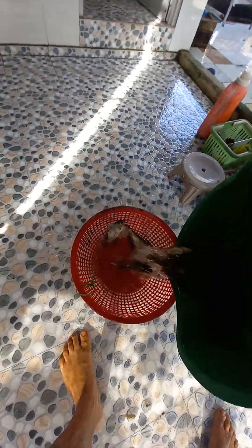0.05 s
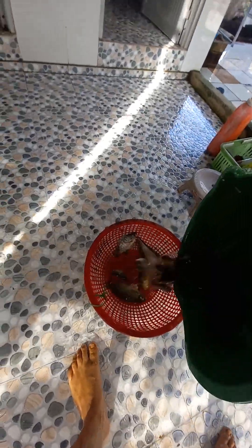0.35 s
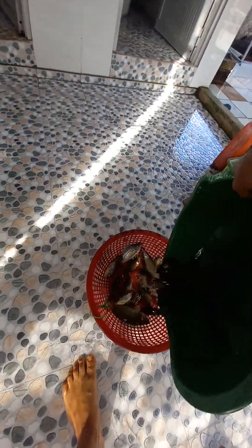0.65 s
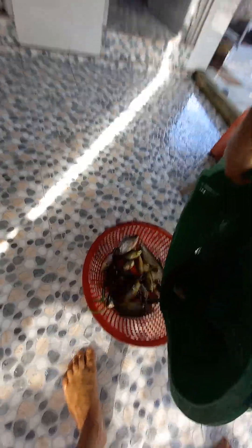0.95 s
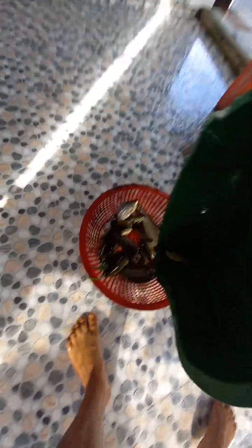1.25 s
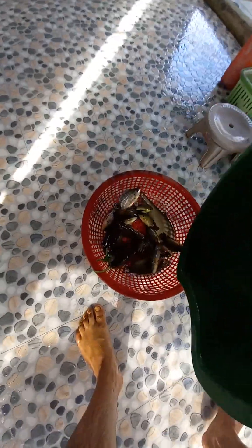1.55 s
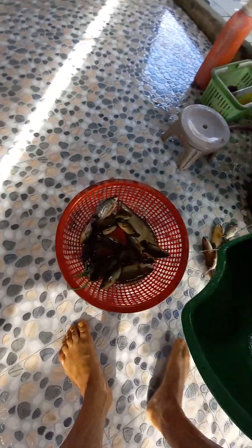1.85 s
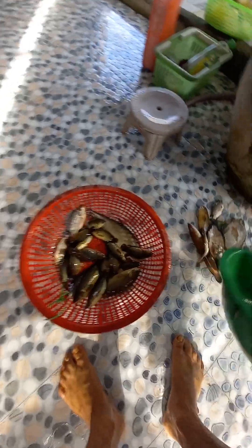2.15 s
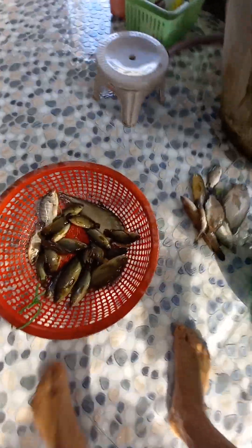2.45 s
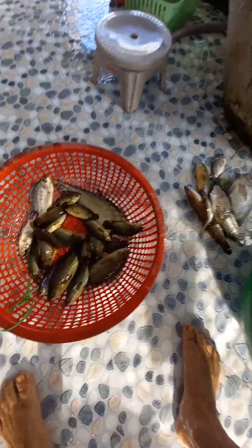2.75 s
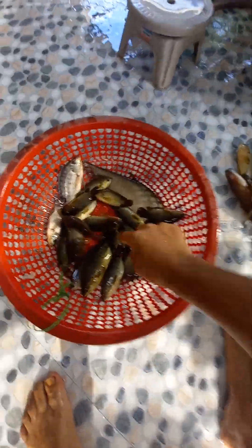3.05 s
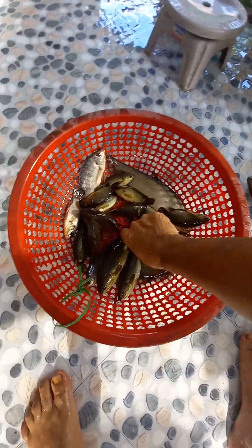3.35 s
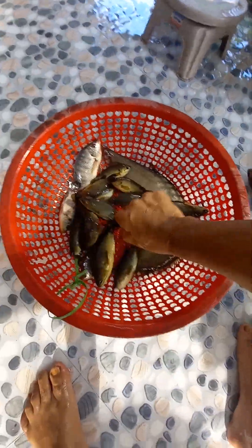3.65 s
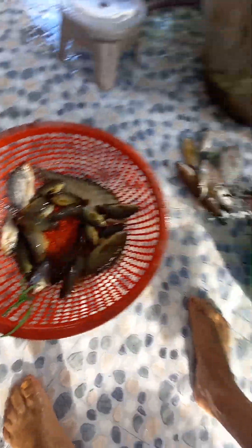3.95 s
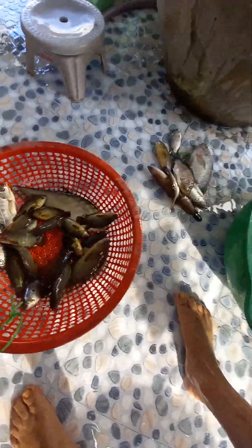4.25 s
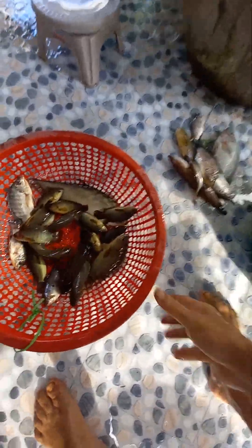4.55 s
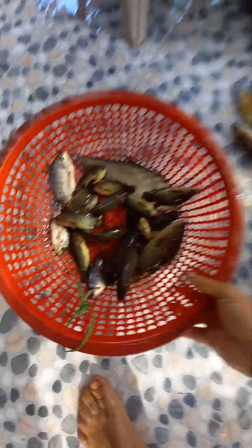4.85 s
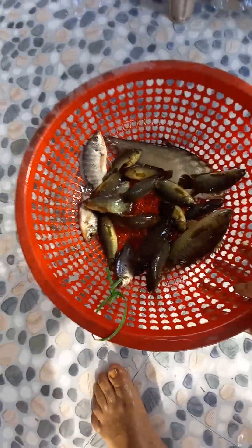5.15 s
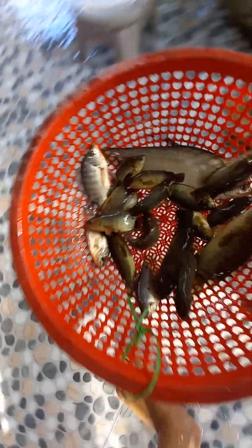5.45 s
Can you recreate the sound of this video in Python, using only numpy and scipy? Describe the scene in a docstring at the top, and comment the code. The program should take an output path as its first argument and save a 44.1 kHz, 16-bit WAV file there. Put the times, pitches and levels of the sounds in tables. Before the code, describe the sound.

Close by in a small walled yard, a splashing, gurgling pour drops water and fish into a plastic basket and quickly dies away. A hollow thump marks the empty bucket landing on pebbles. It scrapes along with a throbbing buzz and gritty clicks, over faint wet smacks of fish being stirred, and stops with a clattering knock. Finally the fish swish briefly as the basket is shifted.

```python
"""Water and small fish pour from a plastic bucket into a mesh basket on pebbles, thinning to drips.
The water sounds through impacts and ringing bubbles. The empty bucket is set down with a hollow boom
of its modes, judders over the pebbles in a stick-slip buzz and knocks to rest. Meanwhile a hand stirs
the fish; a short wet swish follows as it grips the basket and shifts it. A walled yard echoes."""
import sys
import numpy as np
from scipy import signal
from scipy.fft import rfft, irfft
from scipy.io import wavfile
from scipy.ndimage import uniform_filter1d

SR = 44100
rng = np.random.default_rng(int(sys.argv[2]) if len(sys.argv) > 2 else 0)


def pcm_store(signal):
    """Save signal as 16-bit PCM."""
    levels = np.round(np.clip(np.atleast_2d(signal), -1, 1) * 32767)
    wavfile.write(sys.argv[1], SR, levels.astype(np.int16).T)


N = 251502
TIME = np.arange(N) / SR

# bucket modes: freq_hz, base_struck_db, wall_struck_db, t60_s
BUCKET_MODES = [(87, -25.5, -40.5, 0.29), (148, -20.5, -52.5, 0.58), (211.3, -23, -40, 0.31),
                (243.7, -27, -11, 0.34), (280, -13, -29, 0.22), (322, 0, -15.5, 0.44),
                (346.5, -10, -1, 0.23), (382, -17, -1, 0.15), (430, -21, -14, 0.14),
                (464.7, -22.5, -17.5, 0.33), (541, -29.5, -22, 0.35), (624, -22, -3, 0.088),
                (856.5, -10.5, -12, 0.15), (949.6, -15, -16.5, 0.31)]
# spectra: freq_hz, density_db
SPRAY_SPECTRUM = [(2500, -13), (3600, -1.5), (6900, 3.5), (7700, -11.5), (10500, -6.5), (12800, -4.5),
                  (16000, -10.5)]
GRIND_SPECTRUM = [(200, -21.5), (500, -6.5), (750, -2), (900, 0.5), (1400, 0), (1800, -5.5), (2720, -9),
                  (3100, -17), (6500, -24.5), (8500, -39)]
TICK_SPECTRUM = [(500, -16.5), (1400, 5.5), (2400, 1.5), (3200, -2), (6800, -1), (7800, -13),
                 (10500, -13.5), (13000, -8), (16000, -11)]
RUMBLE_SPECTRUM = [(30, -32), (55, -10), (78, 7), (120, -4.5), (165, -21), (400, -71)]


def from_db(db):
    return 10 ** (np.asarray(db) / 20)


def unit_rms(x):
    return x / np.sqrt(np.mean(x ** 2) + 1e-20)


def at_hz(points, hz):
    """Table lookup on a log-frequency axis."""
    known_hz, values = np.transpose(points)
    return np.interp(np.log(hz + 1), np.log(known_hz), values)


def pan(x, left_db):
    return x * from_db(np.array([[left_db], [-left_db]]) / 2)


def add(out, start_s, sound):
    start = int(start_s * SR)
    out[:, start:start + sound.shape[1]] += sound[:, :N - start]


def colour(x, spectrum, size=4096):
    """Minimum-phase filter; keeps the power of white noise."""
    cepstrum = irfft(np.log(from_db(at_hz(spectrum, np.fft.rfftfreq(size, 1 / SR)))))
    cepstrum[1:size // 2] *= 2
    cepstrum[size // 2 + 1:] = 0
    response = irfft(np.exp(rfft(cepstrum)))
    return signal.oaconvolve(x, response[None] / np.linalg.norm(response), axes=1)[:, :N]


def stereo(pair):
    """Two unrelated signals as mid and side: narrow bass, wide treble."""
    # left-right likeness: freq_hz, correlation
    likeness = [(100, 0.95), (330, 0.84), (700, 0.9), (1400, 0.1), (4000, 0.5), (16000, 0.05)]
    size = 2 ** 18
    alike = at_hz(likeness, np.fft.rfftfreq(size, 1 / SR))
    side = irfft(rfft(pair[1], size) * np.sqrt((1 - alike) / (1 + alike)))[:N]
    return np.array([pair[0] + side, pair[0] - side])


def noise():
    return rng.standard_normal((2, N))


def grains(per_s, spread_db):
    """Two streams of uneven random clicks, rms 1."""
    sizes = from_db(spread_db * np.minimum(rng.exponential(1, N), 3))
    return unit_rms(noise() * sizes * (rng.random(N) < per_s / SR) / np.sqrt(per_s))


def drift(per_s):
    """Slow random curve, standard deviation 1."""
    knots = rng.standard_normal(4096)
    return np.interp(TIME * per_s, np.arange(len(knots)), knots) * np.sqrt(3 / 2)


def clumps(per_s, depth_db):
    """Wandering gain, rms 1."""
    return unit_rms(from_db(depth_db * np.clip(drift(per_s), -2, 2)))


def swell(start_s, length_s, db, attack_s, t60_s):
    """Gain that rises, holds and decays."""
    age_s = TIME - start_s
    return np.clip(age_s / attack_s, 0, 1) * from_db(db - 60 * np.clip((age_s - length_s) / t60_s, 0, 2))


def swells(rows, attack_s, t60_s):
    """One gain per level column; the strongest swell wins."""
    out = 0
    for start_s, length_s, *levels_db in rows:
        out = np.maximum(out, from_db(levels_db)[:, None] * swell(start_s, length_s, 0, attack_s, t60_s))
    return out


def ring(drive, hz, t60_s):
    """Resonator: a unit click starts a decaying unit sine."""
    r, w = np.exp(-np.log(1000) / (t60_s * SR)), 2 * np.pi * hz / SR
    return signal.lfilter([0, np.sin(w)], [1, -2 * r * np.cos(w), r * r], drive + 1e-18)


def bursts(start_s, db, t60_s, rise_s):
    """A decaying puff of noise at each start."""
    clicks = np.bincount(np.round(start_s * SR).astype(int), from_db(db), N)[:N]
    envelope = signal.lfilter([1], [1, -np.exp(-np.log(1000) / (t60_s * SR))], clicks + 1e-18)
    r = np.exp(-1 / (rise_s * SR))
    return noise() * signal.lfilter([1 - r], [1, -r], envelope)


def bubbles(per_s, spectrum, t60_cycles, spread_db, sizes=40):
    """Bubbles of many sizes ring at random times."""
    clicks, size_index = grains(per_s, spread_db), rng.integers(0, sizes, N)
    pitch_hz = np.geomspace(spectrum[0][0], spectrum[-1][0], sizes) * np.exp(rng.normal(0, 0.019, sizes))
    rings = (ring(clicks * (size_index == k), hz, t60_cycles / hz) * hz * from_db(at_hz(spectrum, hz))
             for k, hz in enumerate(pitch_hz))
    return unit_rms(sum(rings))


def pour():
    """The stream slaps the basket, froths and sprays; fish flop in; last sloshes empty the bucket."""
    # stream strength: time_s, level_db
    stream = [(0.0, -27), (0.25, -28.5), (0.368, -27), (0.532, -35.5), (0.818, -39), (1.092, -54),
              (1.25, -62)]
    # fish landing: start_s, level_db
    fish_flops = [(0.075, -33.5), (0.481, -38.5), (0.828, -43.5), (0.954, -45)]
    # last fish and water sliding out: start_s, length_s, splash_db, spray_db
    sloshes = [(1.262, 0.035, -45, -56.5), (1.312, 0.085, -41.5, -61), (1.41, 0.092, -53, -59.5),
               (1.56, 0.24, -59.5, -66), (1.925, 0.038, -63, -54.5)]
    # bubble spectrum: freq_hz, density_db
    gurgle_spectrum = [(650, -22.5), (850, -2.5), (1200, -7.5), (1700, -14.5), (2500, -3.5), (3600, -8)]
    time_s, level_db = np.transpose(stream)
    fall_db = np.interp(TIME, time_s, level_db - level_db.max())
    running = swell(-0.0093, time_s[-1], 0, attack_s=0.015, t60_s=0.44)
    slosh, slosh_spray = swells(sloshes, attack_s=0.04, t60_s=0.18)
    flops = sum(swell(start_s, 0.03, db, attack_s=0.01, t60_s=0.2) for start_s, db in fish_flops)
    splash = running * from_db(-30 + 1.133 * fall_db)  # falls faster than the flow
    spray = running * from_db(-34 + fall_db) + slosh_spray
    slap = np.hypot(running * from_db(-38.5 + fall_db), flops) + from_db(-11) * slosh
    flow = 0.2 + np.sqrt(splash / splash.max())
    thuds = colour(grains(2200 * flow, 3.5),
                   [(70, -11), (160, -2), (260, 2.5), (340, 6), (450, -4.5), (650, -3), (1200, -35.5)])
    patter = grains(8000 * flow, 2.9) * clumps(100, 4.2)
    froth = colour(patter, [(400, -21), (800, 7), (1600, 7.5), (2550, 11), (3400, 5), (5000, -24)])
    gurgle = bubbles(1100 * flow, gurgle_spectrum, t60_cycles=20, spread_db=3.2)
    droplets = bubbles(2200 * flow, SPRAY_SPECTRUM, t60_cycles=22, spread_db=3)
    fizz = colour(grains(12000 * flow, 1.5), SPRAY_SPECTRUM) * clumps(90, 3.2)
    churn = from_db(-2.5) * gurgle + from_db(-1.5) * froth
    muffled = signal.lfilter(*signal.butter(1, 1300, fs=SR), churn)  # inside the bucket
    water = splash * churn + slosh * muffled
    mist = spray * (fizz + droplets)
    return pan(stereo(slap * thuds + water), -0.49) + pan(stereo(mist), 0.69)


def background():
    """Faint outdoor air; a low rumble swells near the end."""
    # outdoor air: freq_hz, density_db
    air_spectrum = [(30, -4), (86, -7), (345, -10.5), (570, -20), (2600, -22.5), (3300, -29.5), (6700, -25),
                    (8100, -37.5), (16000, -48.5)]
    gain = from_db(-58) * clumps(4.7, 0.77) + swell(5.34, 0.29, -56, attack_s=0.021, t60_s=0.18)
    rumble = gain * colour(noise(), RUMBLE_SPECTRUM)
    air = from_db(-65) * colour(noise(), air_spectrum)
    return pan(stereo(rumble + air), -2)


def plop(hz, left_db, loss_db_per_cycle):
    """One bubble rings, rising in pitch as it dies."""
    t = TIME[:SR // 16]
    cycles = hz * t * (1 + 0.63 * t)
    lead_rad = np.array([[0], [rng.normal(0, 0.25)]])
    envelope = from_db(-loss_db_per_cycle * cycles) * (1 - np.exp(-2 * cycles))
    return pan(envelope * np.sin(2 * np.pi * cycles + lead_rad), left_db)


def splats(count=6, length_s=0.013, spread_octaves=0.33):
    """Each wet slap sheds a quick run of similar bubbles."""
    # slaps of water and fish: start_s, bubble_db, pitch_hz
    slaps = [(0.019, -17.5, 2200), (0.178, -20, 1790), (0.197, -16, 2330), (0.29, -28, 960),
             (0.324, -18, 2590), (0.829, -33, 1780), (1.288, -44, 938), (2.886, -37.5, 1850),
             (3.289, -33.5, 2210), (3.487, -33, 1580), (3.709, -25, 1840)]
    out = np.zeros((2, N))
    for start_s, db, hz in slaps:
        for k, (detune, side) in enumerate(rng.standard_normal((count, 2))):
            delay_s = length_s * (k + rng.random()) / count
            bubble = plop(hz * 2 ** (spread_octaves * detune), 5 * side, loss_db_per_cycle=2)
            add(out, start_s + delay_s, from_db(db) * bubble)
    return out


def drops():
    """Each drop lands with a splat and traps one bubble."""
    # single drops: start_s, bubble_db, pitch_hz, left_db, splat_db
    landings = [(0.0528, -5.5, 2530, -10, -40), (0.116, -4.5, 2460, -6, -23), (0.13, -8.5, 1620, 3, -23.5),
                (0.227, -5.5, 12970, 5, -23.5), (0.462, -17, 4780, 24, -17.5), (0.4978, -19, 814, 0, -22),
                (0.5955, -23.5, 2100, 4, -41), (0.6248, -19.5, 4260, 10, -25.5), (0.68, -19, 6400, -4, -40),
                (0.723, -31, 1600, -7, -28), (0.81, -19, 2850, -8, -31), (0.9101, -40, 2550, 4, -25.5),
                (0.959, -33, 1440, -6, -28.5), (1.073, -24, 11800, -1, -42.5),
                (1.8166, -32.5, 5920, 6, -55), (2.083, -47, 2120, -19, -56), (5.189, -37.5, 2110, -7, -71)]
    plops = np.zeros((2, N))
    for start_s, db, hz, left_db, _ in landings:
        add(plops, start_s, from_db(db) * plop(hz, left_db, loss_db_per_cycle=1.5))
    start_s, *_, splat_db = np.transpose(landings)
    impacts = bursts(start_s, splat_db, t60_s=0.028, rise_s=0.00022)
    return plops + stereo(colour(impacts, TICK_SPECTRUM))


def knocks(bend_share=0.035, bend_s=0.064):
    """The base booms, the wall clatters; hard contacts clack, soft ones spare the upper modes."""
    # blows on the bucket: start_s, boom_db, clack_db, place (0 base, 1 wall)
    blows = [(1.425, -32.5, -48, 0.65), (1.470, -45, -53, 0.69), (2.4114, -1, -18, 0.12),
             (2.4858, -13.5, -27, 1), (2.545, -28.5, -29.5, 0.17), (2.9235, -30.5, -36, 0.13),
             (2.944, -41, -31.5, 0), (2.965, -26, -29.5, 0.082), (3.639, -21.5, -34, 0.36),
             (4.35, -32, -29.5, 1), (4.3628, -7, -15, 0.93), (4.375, -13, -18.5, 0.65),
             (4.398, -17.5, -35, 0.95), (4.511, -22.5, -29.5, 0.81), (4.578, -33.5, -25, 0),
             (4.597, -20, -24, 0.71), (5.1879, -43, -47, 0.5)]
    hz, base_db, wall_db, t60_s = np.transpose(BUCKET_MODES)[:, :, None]
    t = TIME[:SR * 2 // 3]
    polarity = (-1) ** np.arange(len(BUCKET_MODES))
    decay = from_db(-60 * t / t60_s)
    boom = np.zeros((1, N))
    for start_s, boom_db, clack_db, place in blows:
        tilt_db_per_octave = min(clack_db - boom_db + 14.5, 0)
        treble_db = tilt_db_per_octave * np.maximum(np.log2(hz / 400), 0)
        mode_db = base_db + place * (wall_db - base_db) + treble_db
        # a strong blow stretches the plastic: pitch starts sharp, then sags
        clock_s = t + bend_share * from_db(boom_db) * bend_s * (1 - np.exp(-t / bend_s))
        modes = from_db(boom_db + mode_db) * decay * np.sin(2 * np.pi * hz * clock_s)
        add(boom, start_s, (polarity @ modes)[None])
    contact = np.hanning(SR // 900)
    boom = np.convolve(boom[0], contact / contact.sum())[:N]
    start_s, _, clack_db, _ = np.transpose(blows)
    clack = colour(bursts(start_s, clack_db, t60_s=0.059, rise_s=0.00064), GRIND_SPECTRUM)
    return pan(boom, -4) + pan(stereo(clack), -0.5)


def flex(x, depth, per_s):
    """A bending wall: all pitches wander together."""
    position = np.cumsum(1 + depth * drift(per_s))
    return np.array([np.interp(position, np.arange(N), channel, period=N) for channel in x])


def judder():
    """The rim catches and slips on pebbles; wall modes swell in turn as the contact wanders."""
    # spurts of rolling: start_s, length_s, drone_db, grind_db
    spurts = [(1.512, 0.058, -54.5, -61), (2.53, 0.096, -34, -46), (2.665, 0.09, -36, -40),
              (2.92, 0.075, -31, -45), (3.14, 0.04, -35, -41), (3.265, 0.18, -36.5, -42),
              (3.46, 0.089, -33, -40), (3.625, 0.094, -32, -39), (3.785, 0.26, -35, -41.5),
              (3.985, 0.35, -32, -40.5), (4.38, 0.096, -35.5, -36), (4.73, 0.097, -45.5, -44.5)]
    drone, grind = swells(spurts, attack_s=0.028, t60_s=0.53)
    rumble = from_db(-12.5) * colour(noise(), RUMBLE_SPECTRUM)
    slips = unit_rms(grains(700, 2) + from_db(-6) * noise())
    push = colour(slips, [(150, 5.5), (340, -2.5), (520, -2), (660, 3.5), (900, -12), (1400, -31)])
    modes = sum((-1) ** k * ring(push, hz, t60_s / 2) * from_db((base_db + wall_db) / 2)
                * clumps(7.2, 1.77) for k, (hz, base_db, wall_db, t60_s) in enumerate(BUCKET_MODES))
    buzz = colour(slips, [(110, -7), (200, -4), (400, -9), (520, 7), (660, -4), (800, -20.5), (2000, -46)])
    wall = flex(unit_rms(modes), depth=0.018, per_s=24) + from_db(-7.5) * buzz
    wall /= np.sqrt(uniform_filter1d(wall ** 2, SR // 30, axis=1) + 1e-12)  # steady pressure evens it
    wall *= from_db(-2) * clumps(32, 2.5)  # throb from pebble to pebble
    rasp = from_db(-6.5) * clumps(63, 1) * colour(slips, GRIND_SPECTRUM)
    crackle = clumps(60, 3) * colour(grains(1100, 3.5) + from_db(-6) * noise(), SPRAY_SPECTRUM)
    grit = from_db(-22.5) * crackle
    return pan(stereo(drone * (wall + rumble)), -2.5) + pan(stereo(grind * (rasp + grit)), -3.1)


def shudders(wobble=0.0237):
    """Stick-slip drives one hollow, unsteady wall note at each catch."""
    # rim catches: start_s, length_s, level_db, pitch_hz
    catches = [(1.537, 0.077, -45.5, 371), (1.98, 0.03, -43.5, 340), (2.315, 0.0098, -47.5, 292),
               (2.733, 0.075, -33.5, 322), (2.937, 0.012, -24.5, 545), (2.987, 0.017, -29, 316.3),
               (3.334, 0.014, -25.5, 321.3), (3.515, 0.048, -34, 256.5), (3.807, 0.025, -33.5, 371.6),
               (3.881, 0.016, -26, 340), (3.995, 0.011, -29, 337.3), (4.071, 0.011, -25, 347.3),
               (4.124, 0.028, -27.5, 332), (4.176, 0.023, -26.5, 332.4), (4.235, 0.078, -27, 327.8),
               (4.479, 0.062, -27.5, 340), (4.737, 0.027, -34, 338.6)]
    clock_s = np.cumsum(1 + wobble * drift(70)) / SR
    notes = sum(swell(start_s, length_s, db, attack_s=0.0092, t60_s=0.098)
                * np.sin(2 * np.pi * hz * clock_s) for start_s, length_s, db, hz in catches)
    return pan(notes * clumps(90, 1.5), -4.5)


def skids():
    """Light, fast slips excite a thin, high rim resonance."""
    # rim skids: start_s, length_s, level_db
    slips = [(1.975, 0.026, -56.5), (2.31, 0.065, -55)]
    # rim response: freq_hz, density_db
    rim_spectrum = [(600, 4), (2200, -10), (2570, 8.5), (3000, -11.5), (6900, -10.5), (8000, -23)]
    push, = swells(slips, attack_s=0.028, t60_s=0.098)
    return stereo(push * colour(grains(4000, 2), rim_spectrum))


def ticks():
    """Grit cracks and wet skins click, each with a brief crumble."""
    # sharp ticks: start_s, level_db
    hits = [(2.4046, -23), (2.411, -23), (2.4837, -23), (2.518, -19), (2.5295, -22.5), (2.724, -33),
            (2.8854, -26.5), (2.923, -33), (2.9645, -39.5), (3.158, -32.5), (3.2153, -32), (3.235, -29),
            (3.293, -32), (3.3955, -30.5), (3.518, -33), (3.568, -38), (3.653, -28.5), (3.7102, -26.5),
            (3.756, -32.5), (3.861, -35), (4.103, -32), (4.2828, -23), (4.321, -26.5), (4.3755, -15.5),
            (4.51, -31)]
    start_s, db = np.transpose(hits)
    crack = bursts(start_s, db - 6, t60_s=0.024, rise_s=0.002)
    crumble = bursts(start_s, db - 27, t60_s=0.2, rise_s=0.003)
    return pan(stereo(colour(crack + crumble, TICK_SPECTRUM)), -0.91)


def stirring():
    """Wet fish stick and part in small smacks under the fingers."""
    # wet smacks: freq_hz, density_db
    smack_spectrum = [(900, -13), (1600, 16.5), (2600, -4), (3300, 5), (6800, -1), (8000, -10), (13000, -5),
                      (16000, -10)]
    smacks = colour(grains(700, 3.2) * clumps(35, 5.5), smack_spectrum)
    envelope = swell(start_s=2.983, length_s=0.78, db=-56, attack_s=0.34, t60_s=0.5)
    return pan(stereo(envelope * smacks), -2.5)


def swish(start_s=5.007, rise_s=0.0064, length_s=0.028, t60_s=0.074, db=-35):
    """Wet fish skid over the mesh as the basket is gripped."""
    # fish on mesh: freq_hz, density_db
    mesh_spectrum = [(600, -29.5), (1200, -17), (1600, -4), (2050, -18), (2600, -3.5), (3300, -14),
                     (7000, -12), (8000, -24), (16000, -15.5)]
    age_s = TIME - start_s
    rise = np.clip(age_s / rise_s, 0, 1) ** 2
    envelope = rise * from_db(db - 60 * np.maximum(age_s - length_s, 0) / t60_s)
    return pan(stereo(colour(envelope * grains(16000, 1.2), mesh_spectrum)), -2.1)


def basket_shift():
    """The wet basket grates faintly on the floor."""
    # basket moves: start_s, length_s, level_db
    moves = [(5.12, 0.26, -66.5), (5.495, 0.017, -66.5), (5.62, 0.065, -62)]
    push, = swells(moves, attack_s=0.0057, t60_s=0.79)
    grate = colour(noise(), GRIND_SPECTRUM) + from_db(4.5) * unit_rms(ring(noise(), hz=345, t60_s=0.187))
    crackle = from_db(-9.5) * colour(grains(300, 3), SPRAY_SPECTRUM)
    return pan(stereo(push * clumps(30, 5.2) * (grate + crackle)), -6)


def yard(x, wet_db=-7, bands=7):
    """Adds the diffuse echo of tiled walls, each band decaying at its own rate."""
    # echo decay: freq_hz, t60_s
    decay_times = [(250, 0.085), (1000, 0.38), (4000, 0.36), (13000, 0.12)]
    t, tail = TIME[:SR * 3 // 4], 0
    edges_hz = np.geomspace(400, 16000, bands + 1)
    for low_hz, high_hz in zip(edges_hz, edges_hz[1:]):
        bandpass = signal.butter(2, [low_hz, high_hz], "band", fs=SR, output="sos")
        band = signal.sosfilt(bandpass, rng.standard_normal((2, len(t))))
        tail = tail + band * from_db(-60 * t / at_hz(decay_times, np.sqrt(low_hz * high_hz)))
    tail *= 1 - np.exp(-t / 0.00079)
    return x + from_db(wet_db) * signal.oaconvolve(x, tail / np.linalg.norm(tail[0]), axes=1)[:, :N]


def scene():
    basket = pour() + drops() + splats() + stirring() + swish() + basket_shift()
    bucket = knocks() + judder() + shudders() + skids() + ticks()
    return yard(basket) + yard(bucket) + background()


def record(dry, low_hz=48, high_hz=16000):
    """Microphone: bass roll-off, clipping at full scale, steep top cut."""
    highpass = signal.butter(2, low_hz, "high", fs=SR, output="sos")
    lowpass = signal.ellip(12, 0.2, 80, high_hz, fs=SR, output="sos")
    return signal.sosfilt(lowpass, np.clip(signal.sosfilt(highpass, dry), -1, 1))


dry = scene()
out = record(dry)
pcm_store(out)
```